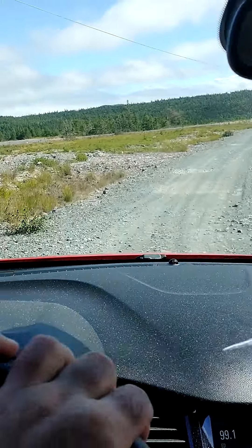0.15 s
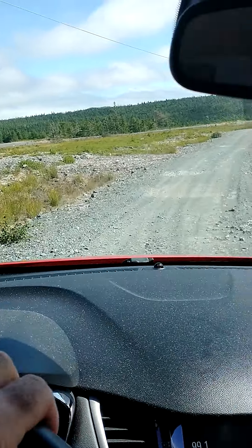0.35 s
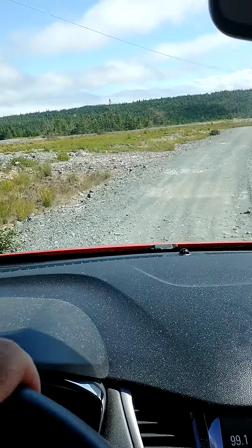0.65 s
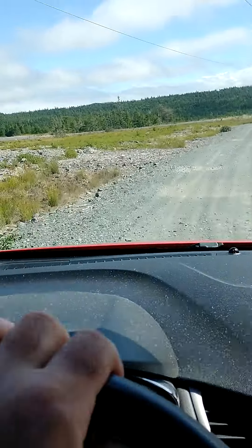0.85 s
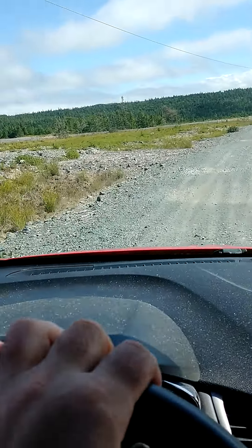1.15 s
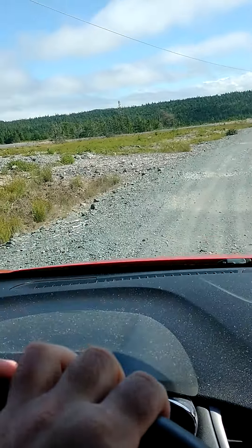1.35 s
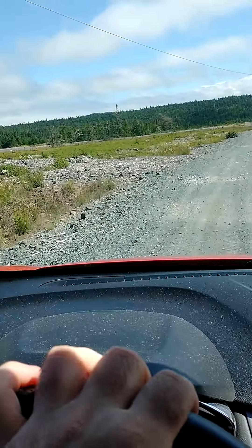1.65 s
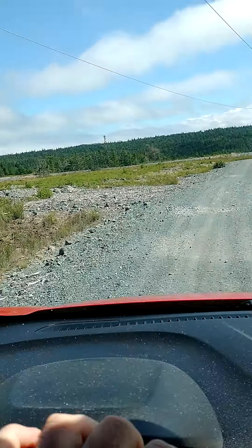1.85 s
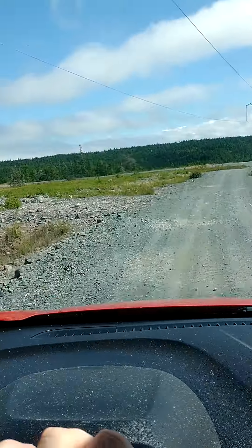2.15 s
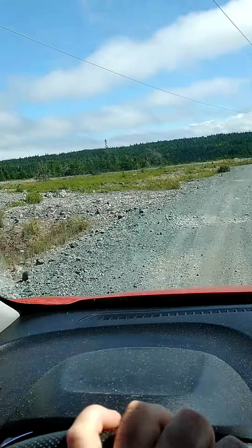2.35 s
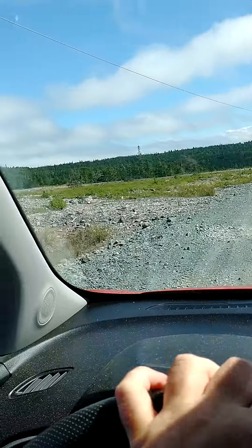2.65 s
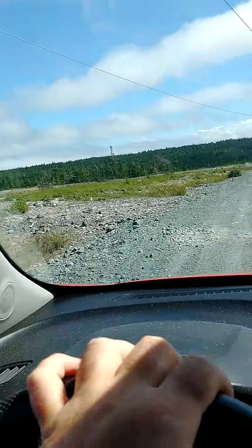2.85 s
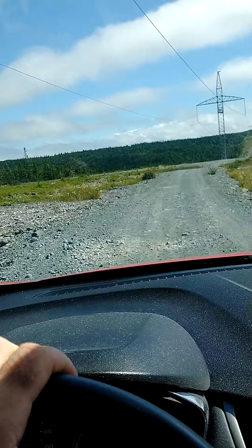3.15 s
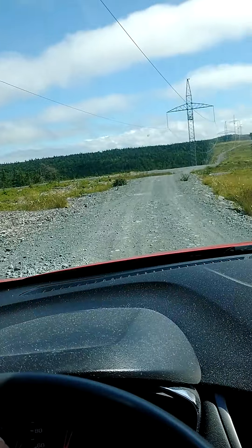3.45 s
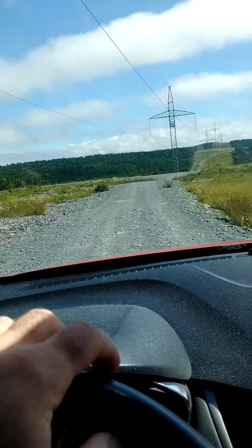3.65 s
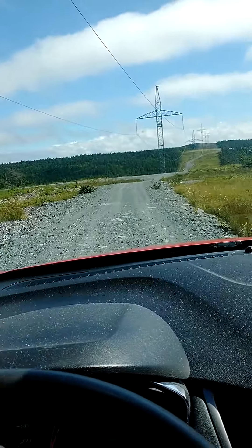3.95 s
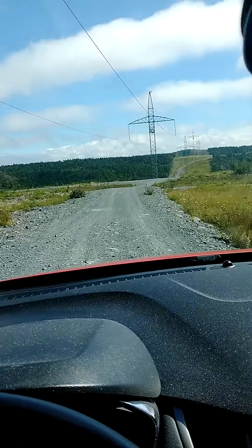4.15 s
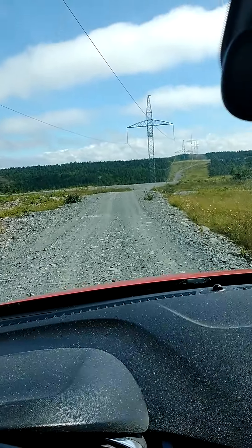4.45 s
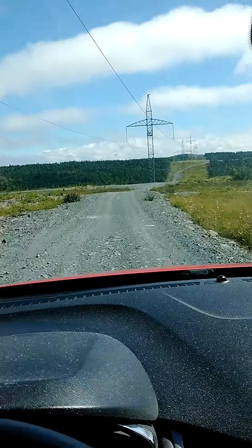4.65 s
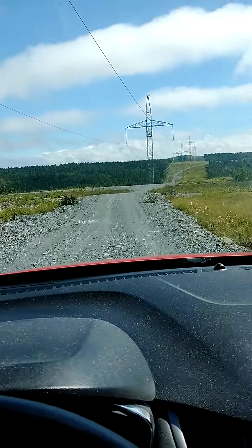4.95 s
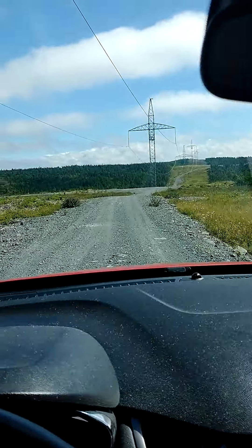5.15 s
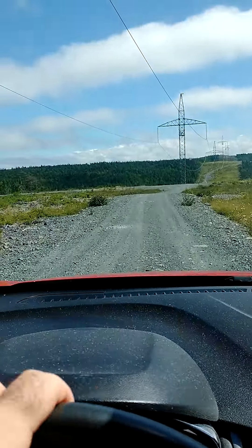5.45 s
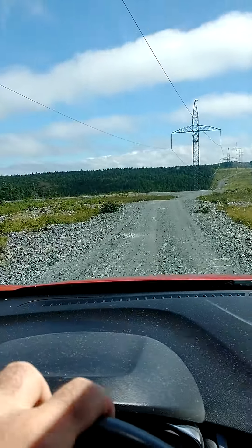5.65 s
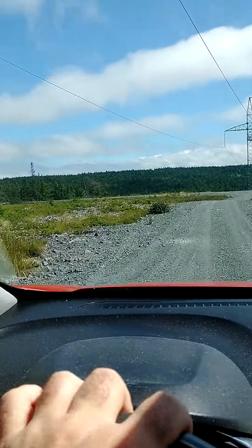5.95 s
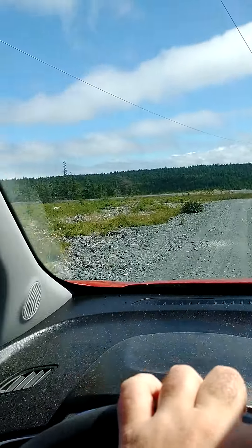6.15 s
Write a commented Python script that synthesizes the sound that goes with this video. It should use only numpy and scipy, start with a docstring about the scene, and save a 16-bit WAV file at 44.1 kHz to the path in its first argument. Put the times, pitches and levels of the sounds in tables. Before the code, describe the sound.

Close, muffled car interior. Low rumble swells with each bump while gravel grinds and stones thump underneath, densest in the first three seconds. The road then gets smoother and quieter, with sparse ticks over a soft vent hiss, until metal keys tinkle and plastic rattles in the last second.

```python
"""Inside a car with the windows shut, at the driver's seat, rolling slowly along a gravel road. Noise through
low cabin resonances booms over a two-partial engine drone; bumps swell them both. Showers of filtered noise
grains make the stones, gravel and grit under the tyres; bigger stones knock on the underbody as single bursts.
Decaying sines tinkle as keys, struck resonances clack twice as hard plastic near the end, and steady filtered
noise hisses from the vents."""
import sys
import numpy as np
from scipy import signal
from scipy.fft import rfft, irfft, next_fast_len
from scipy.io import wavfile
from scipy.ndimage import uniform_filter1d

SR = 44100
rng = np.random.default_rng(int(sys.argv[2]) if len(sys.argv) > 2 else 0)


def waveform_to_disk(signal):
    """Save audio, clipped to [-1, 1], as 16-bit WAV at the path in sys.argv[1]."""
    frames = np.transpose(np.atleast_2d(signal))
    scaled = np.clip(frames, -1, 1) * 32767
    samples = np.round(scaled).astype(np.int16)
    wavfile.write(sys.argv[1], SR, samples)


N = 277871

# the surface under the tyres, as relative levels:
# (time [s], coarse stones [dB], gravel [dB])
ROAD_SURFACE = [(0, -39, -48.5), (.62, -37, -48), (.8, -34, -51.5), (1, -35.5, -44.5), (1.35, -34.5, -48.5),
                (1.75, -35.5, -42.5), (2.1, -38, -47), (2.55, -36, -45), (3.05, -38.5, -50),
                (3.4, -38.5, -53), (3.8, -42.5, -54.5), (4.4, -44.5, -55.5), (4.8, -48, -53),
                (5.3, -47, -50.5), (5.75, -46.5, -53), (5.95, -38.5, -51), (6.3, -41.5, -55.5)]


def boom():
    """The uneven road shakes the body and rings the low cabin resonances; noise stands for the shaking."""
    # low air and panel resonances: (frequency [Hz], width [Hz], level before muffling [dB])
    cabin_modes = [(23, 4.1, -10.5), (53, 10, -12.5), (68, 5.4, 1), (86.8, 29, 4), (113.4, 18, 9),
                   (130.4, 7.4, 4.5), (166.7, 3, -12), (179, 4.9, -13)]
    body = sum(undb(db) * resonance(hz, width) for hz, width, db in cabin_modes)
    muffling = colour([(8, -30.5), (20, 7.0), (180, -6.0), (240, -16.0),
                       (400, -35.5), (1000, -53.0), (8000, -100)])
    return steady(at_seat(rng.standard_normal((2, N)), body * muffling), 0.1)


def engine(firing_hz=54.82, wander=0.03306, octave_db=2):
    """A lightly loaded engine: firing rate and its octave, wavering with the throttle in pitch and level."""
    firing_now_hz = firing_hz * (1 + wander * walk(3.7))
    phase = 2 * np.pi * np.cumsum(firing_now_hz) / SR
    drone = np.sin(phase) + undb(octave_db) * np.sin(2 * phase)
    return unit(drone * undb(2 * walk(8.3)))


def rolling():
    """How hard plain rolling shakes the body: more on coarser stones."""
    coarsest_db, growth = -22, 0.26  # level on the coarsest stretch [dB], dB per dB of coarseness
    coarse_db = curves(ROAD_SURFACE)[0]
    return undb(coarsest_db + growth * (coarse_db - coarse_db.max()))


def shake():
    """How hard the body is shaken: rolling, and a jolt from every bump."""
    # the wheels cross a bump or a run of ruts: (time [s], length [s], shake level [dB])
    bumps = [(0.1, 0.44, -23), (0.676, 0.22, -18), (1.016, 0.81, -22), (1.961, 0.57, -20.5),
             (2.614, 0.39, -22), (3.232, 0.39, -23.5), (3.909, 0.41, -27), (4.443, 0.037, -21.5),
             (5.047, 0.089, -23.5), (5.299, 0.19, -23.5), (5.542, 0.2, -27), (5.781, 0.23, -21),
             (6.04, 0.3, -26)]
    attack_s, release_s = 0.0024, 0.015
    jolts = sum(undb(db) * swell(s, length, attack_s, release_s) for s, length, db in bumps)
    return np.hypot(rolling(), jolts)


def loose_gravel():
    """Strength of the grit, the flying chips and the lingering spray as the tyres plough loose patches."""
    # (time [s], length [s], grit [dB], flying chips before their trim and colour [dB],
    #  fine spray [dB], spray settling time constant [s])
    loose_patches = [(0.664, 0.24, -51.5, -64, -60.5, 0.11), (1.1, 0.78, -67, -76.5, -69, .1),
                     (1.877, .26, -61.5, -64, -64, 0.37)]
    attack_s, release_s, spray_attack_s = 0.054, 0.083, 0.25
    grit = flying = spray = 0
    for s, length, grit_db, chips_db, spray_db, settle in loose_patches:
        ploughing = swell(s, length, attack_s, release_s)
        grit = grit + undb(grit_db) * ploughing
        flying = flying + undb(chips_db) * ploughing
        spray = spray + undb(spray_db) * swell(s, length, spray_attack_s, settle)
    return grit, flying, spray


def tyres(spray_growth=4.0, ploughed_db=4, judder_db=25.0, bump_share=0.23, lumps_db=1.5):
    """Coarse stones thud through the suspension, gravel crunches under the tread, grit rattles in arches."""
    # colours as they reach the seat, each (frequency [Hz], gain [dB])
    thud_colour = [(130, -20), (185, -1), (212, 0.5), (240, -2), (262, -1), (278, 3), (300, 0), (335, -5),
                   (400, -9), (460, -7), (520, -12), (640, -16), (1000, -36), (8000, -100)]
    crunch_colour = [(400, -8), (520, -4), (650, -5.5), (760, 1.5), (920, -5), (1050, -1.5), (1330, -9.5),
                     (1500, -6), (1680, -12.5), (2000, -7), (3000, -59), (9000, -82)]
    grit_colour = [(1300, -13), (1600, -4), (1850, -1), (2000, -3.5), (2170, 0), (2480, -7), (2680, 2),
                   (2900, -7), (3250, -13), (3650, -14), (4100, -16), (4800, -23), (6500, -33),
                   (10000, -43), (15000, -52)]
    # finest spray in the wheel arches: (frequency [Hz], gain [dB])
    spray_colour = [(1200, -45), (2400, -8), (2750, 3), (3400, 0), (4150, 3), (4700, -9), (6000, -19),
                    (9000, -25), (15000, -31)]
    # the tread drones on the packed wheel track: (time [s], level [dB])
    packed_track = [(0, -55), (2.2, -66), (2.5, -51), (3.3, -53.5), (4.3, -56.5), (4.7, -58.5),
                    (4.9, -63.5), (6.3, -73)]

    coarse_db, gravel_db = curves(ROAD_SURFACE)
    depth_db = gravel_db - gravel_db.max()
    thrown, _, sprayed = loose_gravel()
    # bumps and lumps press the tyres harder into the stones
    load = (shake() / rolling()) ** bump_share * undb(lumps_db * walk(22))

    thud = at_seat(grains(per_s=120, spread_db=1.5, t60=0.036), colour(thud_colour))
    thud = steady(thud, 0.29) * undb(coarse_db + 2.0) * load

    crunch = at_seat(grains(per_s=130, spread_db=2.5, t60=0.053), colour(crunch_colour))
    crunch_level = np.hypot(undb(gravel_db - 0.5) * load, thrown * undb(ploughed_db))
    crunch = steady(crunch, 0.24) * crunch_level

    grit = at_seat(grains(per_s=150, spread_db=0.5, t60=0.033), colour(grit_colour))
    # off the loose patches the grit follows the gravel, 0.61 dB per dB
    grit = steady(grit, 0.22) * np.hypot(undb(-56 + 0.61 * depth_db), thrown)

    spray = at_seat(grains(per_s=250, spread_db=4.5, t60=0.044), colour(spray_colour))
    # the finest spray grows faster with depth than the crunch itself
    spray = unit(spray) * np.hypot(undb(spray_growth * depth_db - 68.0), sprayed)

    drone = at_seat(rng.standard_normal((2, N)), resonance(1177, 210) ** 2)
    drone = unit(drone) * undb(curves(packed_track)[0])

    # ploughing makes the suspension judder
    suspension = resonance(185, 80) ** 2 + 0.5 * resonance(290, 70) ** 2
    judder = at_seat(grains(per_s=60, spread_db=-2.0, t60=0.014), suspension)
    judder = unit(judder) * thrown * undb(judder_db)
    return thud + crunch + grit + spray + drone + judder


def stones(small_thump_db=5, small_rap_db=-12, small_hz=720, knock_left_db=1, rap_left_db=-2):
    """Bigger stones hit the floor pan: a low thump, a knock pitched by the spot they strike, a hard rap."""
    # big stones on tyres and underbody:
    # (time [s], low thump [dB], knock [dB], knock pitch [Hz], hard rap before its left/right lean [dB])
    hits = [(.065, -39, -47, 760, -49), (.244, -36, -47, 693, -60.5), (.586, -49, -38.5, 700, -66),
            (.628, -36.5, -43, 700, -58.5), (0.78, -32.5, -42.5, 800, -48.5), (.852, -41, -41, 770, -45.5),
            (1.078, -38, -43.5, 696, -57), (1.181, -39, -40.5, 715, -61.5), (1.219, -37, -37, 710, -61),
            (1.265, -36, -41, 700, -70.5), (1.314, -42, -44, 890, -52.5), (1.349, -31.5, -38, 620, -53),
            (1.452, -41, -41, 630, -60.5), (1.476, -35, -41.5, 760, -52.5), (1.604, -30, -41, 560, -62),
            (1.628, -33, -40.5, 760, -58.5), (1.719, -49, -43.5, 760, -47), (1.792, -35, -35.5, 600, -53),
            (1.929, -36, -43, 760, -44), (2.124, -40, -44, 700, -58), (2.155, -33.5, -39, 700, -63),
            (2.338, -38, -49, 745, -53), (2.383, -36.5, -37.5, 680, -51.5), (2.446, -35, -43, 775, -50),
            (2.603, -40, -42.5, 704, -63), (2.684, -40.5, -35.5, 584, -54), (2.731, -38.5, -44, 640, -51.5),
            (2.79, -38, -49.5, 700, -58), (2.938, -34.5, -31.5, 567, -51), (2.956, -27.5, -30, 525, -48.5),
            (3.186, -46.5, -32.5, 620, -61), (3.189, -47.5, -42.5, 1140, -59.5),
            (3.276, -42, -37.5, 620, -54.5), (3.469, -35.5, -52, 690, -67), (3.641, -39, -44.5, 760, -55.5),
            (3.691, -35, -39, 500, -66), (4.451, -37, -39.5, 700, -53.5), (4.471, -41, -48, 700, -61),
            (6.138, -36.5, -41, 804, -58), (6.174, -42, -46, 1010, -55)]
    gravel_db = curves(ROAD_SURFACE)[1]
    small = []
    # lesser stones strike at random, 5.1 a second, around 7 dB below the gravel
    for s, db in by_chance(5.1, -7):
        knock_db = db + gravel_db[int(s * SR)]
        small.append((s, knock_db + small_thump_db, knock_db, small_hz, knock_db + small_rap_db))

    out = np.zeros((2, N))
    for s, thump_db, knock_db, knock_hz, rap_db in hits + small:
        thump = blow(220, 440, t60=.085, rise=.001)
        thump = thump + 0.6 * thump[::-1]  # the long waves reach both sides
        add(out, s, onset_unit(thump) * undb(thump_db))

        knock = band(contact(t60=.115, scatter=2.4), knock_hz / 1.3, knock_hz * 1.3)
        knock = band(knock, knock_hz / 2, knock_hz * 2)
        add(out, s, onset_unit(knock) * undb(knock_db) * sides(knock_left_db))

        rap = blow(1300, 2600, t60=0.13, rise=0.00051)
        add(out, s, rap * undb(rap_db) * sides(rap_left_db))
    return out


def chips(shower_db=-3):
    """Small chips snap out from under the tread with a dry tick, in showers on the loose patches."""
    # the sharpest chips: (time [s], level before the final colour [dB])
    sharp_chips = [(0.065, -62), (0.293, -60), (0.682, -62), (.79, -64), (.826, -63), (.852, -63.5),
                   (.888, -64), (1.075, -66), (1.313, -63), (1.479, -75), (1.721, -64.5), (1.93, -60),
                   (2.012, -62), (2.065, -63), (3.605, -66.5), (3.821, -65), (3.992, -70), (4.051, -68),
                   (4.273, -73), (4.453, -72.5), (4.6, -71.5), (5.303, -65.5), (5.547, -59)]
    shower = unit(band(grains(per_s=110, spread_db=4.5, t60=0.044), 4500, 11000))
    out = shower * loose_gravel()[1] * undb(shower_db)
    # fainter chips fly at random, 2.5 a second
    for s, db in sharp_chips + by_chance(2.5, -78):
        add(out, s, blow(2300, 10000, t60=0.08, rise=0.001) * undb(db))
    return through(out, colour([(3000, 8.0), (4800, 3.5), (7000, -5.0), (15000, -3.0)]))


def keys(scatter=0.9, spot_spread_db=1.5, rebound_s=.006):
    """Each touch rings four keys unequally and clatters on rebound; cabin echoes make the rings waver."""
    # what the keys ring with, before chance varies level and decay:
    # (key number, frequency [Hz], level [dB], t60 [s], left minus right [dB])
    key_modes = [(0, 4130, -17, .3, -1), (0, 6312, 4, .11, -6), (0, 6352, 2, .12, -6),
                 (1, 4918, -19.5, .55, -5), (1, 9608, 8, .1, -2), (1, 9540, -1, .04, -2),
                 (1, 14408, 7, .14, 6), (1, 14270, -1, .04, 5), (2, 4922, -20, .55, -5),
                 (2, 5873, -26, .4, 0), (2, 10702, 2, .31, 0), (2, 13300, 3, .22, 3),
                 (3, 3980, -19, .15, 0), (3, 7860, 3, .04, 0), (3, 7992, 2.5, .1, 0), (3, 8030, 2, .1, 0),
                 (3, 8650, -12, .14, 0), (3, 12038, -8, .2, 0)]
    # keys touching, and how hard each rings: (time [s], first key [dB], second key [dB],
    #  third key [dB], fourth key [dB], clatter before the drop at each rebound [dB])
    jingles = [(.116, -76, -84.5, -86.5, -93.5, -86), (.562, -64.5, -66.5, -76.5, -77.5, -73),
               (.986, -63, -68, -68, -68, -67), (1.442, -72.5, -86.5, -80, -89, -88.5),
               (2.154, -71.5, -67, -75.5, -75, -63), (2.577, -81, -78, -83, -82, -83),
               (2.996, -70, -78.5, -68, -92, -84), (3.461, -67.5, -67, -75, -84, -71),
               (4.047, -77, -75.5, -81, -84, -79), (4.367, -94, -85, -82, -88, -76),
               (4.567, -77, -85, -78, -87, -81), (4.7, -77, -77.5, -98, -97, -88),
               (4.898, -75, -68, -68, -81, -66), (5.053, -78, -70, -68, -82.5, -58),
               (5.08, -63, -69, -74, -70, -65), (5.367, -54.5, -69, -61, -69, -61),
               (5.387, -65, -70, -75, -54, -64), (5.457, -62, -57, -42, -46, -52),
               (5.558, -50, -46.5, -48.5, -55, -49), (5.61, -52.5, -52.5, -54, -57, -54),
               (5.713, -57.5, -56, -63, -65, -67), (5.83, -78, -75, -80, -78, -72),
               (5.89, -59, -53, -51, -48, -53), (5.902, -59, -62, -66, -58, -58),
               (5.912, -51, -66, -70, -56, -60), (6.005, -57, -59, -63, -51.5, -55),
               (6.014, -60, -57, -72, -58, -57), (6.028, -53.5, -49.5, -75, -61, -52),
               (6.037, -64, -67, -78, -58, -57), (6.046, -61, -57, -68, -56, -57),
               (6.107, -70, -80, -91.5, -65, -70), (6.235, -44, -37, -53, -49, -56),
               (6.283, -61, -58, -62, -64, -54)]
    out = np.zeros((2, N))
    for s, *key_db, clatter_db in jingles:
        for key, hz, db, t60, left_db in key_modes:
            # where it is struck and how its neighbours damp it
            spot_db, grip_db = rng.normal(0, [spot_spread_db, .8])
            shape = fade(t60 * undb(grip_db), rise=0.0008)
            t = np.arange(len(shape)) / SR
            # the two sides are partly in step
            phase = rng.uniform(0, 2 * np.pi) + rng.uniform(0, np.pi, (2, 1))
            beat_hz = rng.normal(0, 10, (2, 1))
            direct = np.sin(2 * np.pi * hz * t + phase)
            echo_growth = scatter * (1 - np.exp(-t / 0.0046))
            echo = echo_growth * np.cos(2 * np.pi * (hz + beat_hz) * t + phase)
            level = undb(key_db[key] + db + spot_db) * sides(left_db / 2)
            add(out, s, (direct + echo) * shape * level)
        for bounce, gap in enumerate(rng.uniform(.6, 1.4, 3)):
            clatter = blow(4500, 16000, t60=.06, rise=.0006)
            add(out, s + bounce * gap * rebound_s, clatter * undb(clatter_db - 3 - 5 * bounce))
    return out


def plastic_clacks():
    """Hard plastic clacks and rebounds: a dry crack, its ring and the hollow behind it."""
    # what the plastic rings with: (frequency [Hz], width [Hz], relative level [dB])
    clack_modes = [(845, 59, 21.5), (1080, 130, 10.5), (1510, 180, 8), (1910, 300, -1), (2320, 140, 14),
                   (2430, 120, -3), (2650, 90, 8), (3130, 240, -20)]
    # contacts: (time [s], ring [dB], contact brightness [dB per octave], crack [dB], hollow [dB],
    #  left minus right of the ring [dB])
    clacks = [(5.379, -44.5, 6, -60, -50, -6), (5.384, -37, 6, -54.5, -51, -6.5),
              (5.973, -34.5, -13.5, -57, -42, -4), (5.987, -39, -13, -60, -43, -5)]
    out = np.zeros((2, N))
    for s, ring_db, tilt_db, crack_db, hollow_db, left_db in clacks:
        push = contact(t60=.05, scatter=1.1)
        ring = 0
        for hz, width, mode_db in clack_modes:
            # a harder contact favours the higher modes
            gain = undb(mode_db + tilt_db * np.log2(hz / 1000))
            ring = ring + gain * signal.lfilter(*signal.iirpeak(hz, hz / width, fs=SR), push)
        ring = onset_unit(band(ring, 450, 2330))
        add(out, s, ring * undb(ring_db) * sides(left_db / 2))
        add(out, s, blow(2600, 5400, t60=0.06, rise=0.001) * undb(crack_db))
        add(out, s, blow(350, 650, t60=0.082, rise=0.002) * undb(hollow_db))
    return out


def vents():
    """Air rushing through the vents: a soft, steady hiss of coloured noise."""
    # (frequency [Hz], gain [dB])
    hiss_colour = [(300, 5), (1000, 5), (2400, 1), (3500, -13.5), (6000, -18), (10000, -22.5),
                   (15000, -25.5)]
    return unit(at_seat(rng.standard_normal((2, N)), colour(hiss_colour))) * undb(-63)


def at_seat(pair, response):
    """Colour two unrelated signals and spread them: long waves mostly reach both sides alike."""
    # likeness of the two sides: (frequency [Hz], correlation [-1 to 1])
    likeness = [(60, 0.98), (140, 1), (290, 0.91), (640, 0.54), (1200, -0.05), (2800, -0.1),
                (4200, -0.0034), (15000, 1)]
    # left minus right: (frequency [Hz], level [dB])
    side_lean = [(60, -1), (110, 1.5), (380, -1), (700, 3), (1290, -6), (2400, -2), (4400, 0), (9000, 5)]
    alike = np.clip(read(likeness, bins()), -.999, .999)
    mid, side = through(pair, response * np.sqrt([1 + alike, 1 - alike]))
    lean = read(side_lean, bins()) / 2
    return through(np.array([mid + side, mid - side]), undb([lean, -lean]))


def grains(per_s, spread_db, t60):
    """Stones crushed at random moments, per_s under each of four wheels with its own scattered path."""
    out = 0
    for wheel in range(4):
        size = undb(spread_db * np.minimum(rng.exponential(size=N), 3.5))
        hits = (rng.random(N) < per_s / SR) * rng.choice([-1, 1], N) * size
        out = out + signal.oaconvolve(hits[None], burst(t60, 0.00072), axes=1)[:, :N]
    return out


def blow(lo_hz, hi_hz, t60, rise):
    """One contact heard in a band: a noise burst band-passed twice."""
    return onset_unit(band(band(burst(t60, rise), lo_hz, hi_hz), lo_hz, hi_hz))


def contact(t60, scatter):
    """A sharp push that reaches both sides at once, followed by its scattered echoes in the cabin."""
    echoes = burst(t60, .001)
    echoes = echoes * scatter / np.sqrt(np.sum(echoes ** 2) / 2)
    push = np.pad(echoes, ((0, 0), (0, SR // 20)))  # room for ringing
    push[:, 0] += 1
    return push


def burst(t60, rise):
    """A contact scattered by the cabin: fading noise, different on each side."""
    shape = fade(t60, rise)
    return shape * rng.standard_normal((2, SR))[:, :len(shape)]


def fade(t60, rise):
    """A ring that builds up with time constant `rise` [s] and decays by 60 dB in t60 [s]."""
    t = np.arange(int(t60 * SR) + 2) / SR
    return np.exp(-np.log(1000) * t / t60) * (1 - np.exp(-t / rise))


def swell(s, length, attack, release):
    """An envelope that rises from time s, starts to die away `length` after s, all in seconds."""
    t = np.arange(N) / SR - s
    return np.clip(t / attack, 0, 1) * np.exp(-np.maximum(t - length, 0) / release)


def by_chance(per_s, db, spread_db=6.0):
    """Rows (time [s], level [dB]) of small events at random moments."""
    when, size = rng.random((200, 2)).T
    gaps = .3 - .7 * np.log(1 - when)  # never closer than 0.3 of the mean gap
    times = np.cumsum(gaps) / per_s
    return [(s, db + spread_db * (2 * z - 1)) for s, z in zip(times, size) if s < N / SR]


def walk(rate):
    """Smooth random drift with rms 1, stepping `rate` times a second."""
    k = int(SR / rate)
    steps = np.repeat(rng.standard_normal(N // k + 1), k)
    return unit(uniform_filter1d(uniform_filter1d(steps, k), k)[:N])


def curves(table):
    """Each column of a (time [s], ..) table, joined by straight lines in time."""
    s, *columns = np.transpose(table)
    return [np.interp(np.arange(N) / SR, s, c) for c in columns]


def read(points, hz):
    """A (frequency [Hz], value) table joined by lines on a log-frequency axis."""
    f, value = np.transpose(points)
    return np.interp(np.log(hz + 1), np.log(f), value)


def bins():
    """Frequencies [Hz] of a full-length spectrum, with room for tails."""
    size = 2 * next_fast_len(N // 2 + 8192, real=True)
    return np.arange(size // 2 + 1) * SR / size


def through(x, response):
    """Filter by a response given on bins()."""
    return irfft(rfft(x, 2 * (response.shape[-1] - 1)) * response)[..., :N]


def colour(points):
    """Causal (minimum-phase) response with the given (frequency [Hz], gain [dB]) outline."""
    cepstrum = irfft(np.log(undb(read(points, bins()))))
    # fold the cepstrum forward in time
    cepstrum[1:len(cepstrum) // 2] *= 2
    cepstrum[len(cepstrum) // 2 + 1:] = 0
    return np.exp(rfft(cepstrum))


def resonance(hz, width):
    """Response of one damped resonance, gain 1 at its centre."""
    f = bins()
    return 1j * f * width / (hz ** 2 - f ** 2 + 1j * f * width)


def band(x, lo_hz, hi_hz):
    """Gentle band-pass."""
    edges = [lo_hz, min(hi_hz, SR / 2 - 1000)]
    return signal.sosfilt(signal.butter(2, edges, "band", fs=SR, output="sos"), x)


def steady(x, seconds):
    """Even out slow swells and keep the fast throb; rms near 1."""
    power = uniform_filter1d(np.mean(x ** 2, axis=0), int(seconds * SR))
    return x / np.sqrt(power + 1e-18)


def unit(x):
    """Scale to rms 1."""
    return x / np.sqrt(np.mean(x ** 2))


def onset_unit(x):
    """Scale a hit to rms 1 over its first 15 ms."""
    return x / np.sqrt(np.mean(x[:, :int(.015 * SR)] ** 2))


def undb(db):
    """Decibels to gain."""
    return 10 ** (np.asarray(db) / 20)


def sides(left_db):
    """Gains that raise the left by left_db and lower the right by as much."""
    return undb([[left_db], [-left_db]])


def add(out, s, sound):
    """Mix a sound in at time s [s]."""
    i = max(int(s * SR), 0)
    out[:, i:i + sound.shape[-1]] += sound[..., :max(N - i, 0)]


def scene():
    """Everything as it reaches the driver's seat; the shaking drives both boom and engine drone."""
    rumble = (boom() * undb(-0.34) + engine() * undb(-13.0)) * shake()
    return rumble + tyres() + stones() + chips() + keys() + plastic_clacks() + vents()


def record(dry):
    """Cut the top of the treble steeply above 15.7 kHz."""
    return signal.sosfilt(signal.ellip(8, .2, 70, 15700, fs=SR, output="sos"), dry)


dry = scene()
out = record(dry)
waveform_to_disk(out)
```